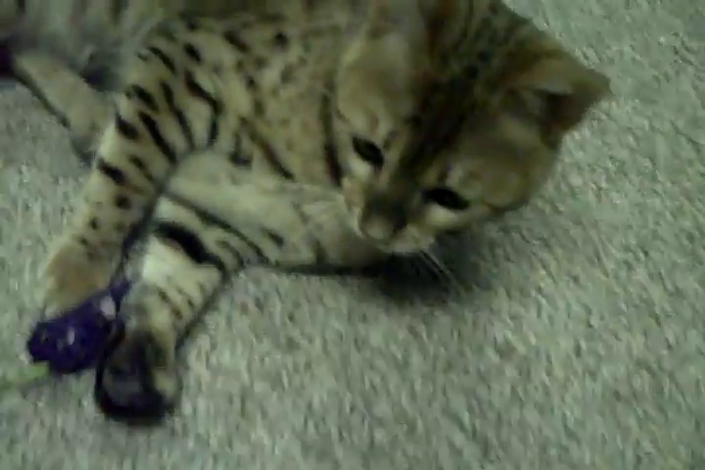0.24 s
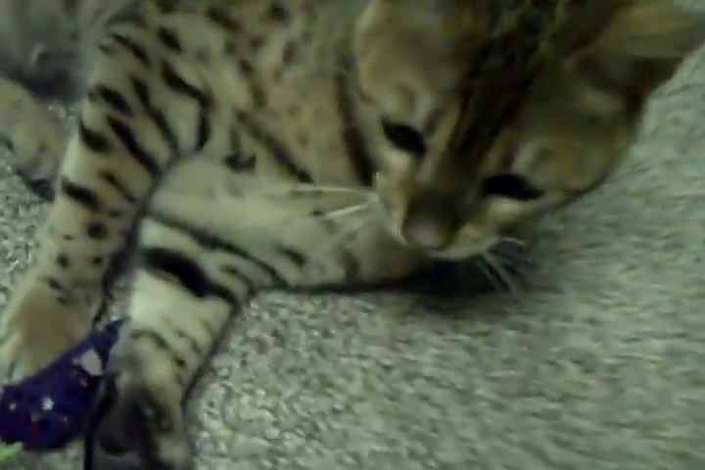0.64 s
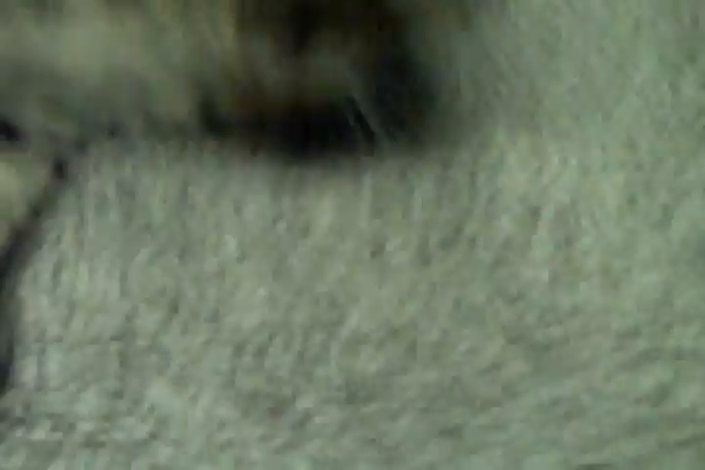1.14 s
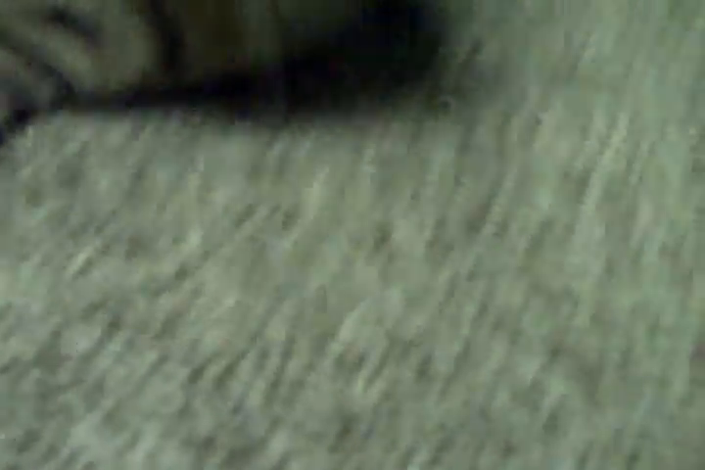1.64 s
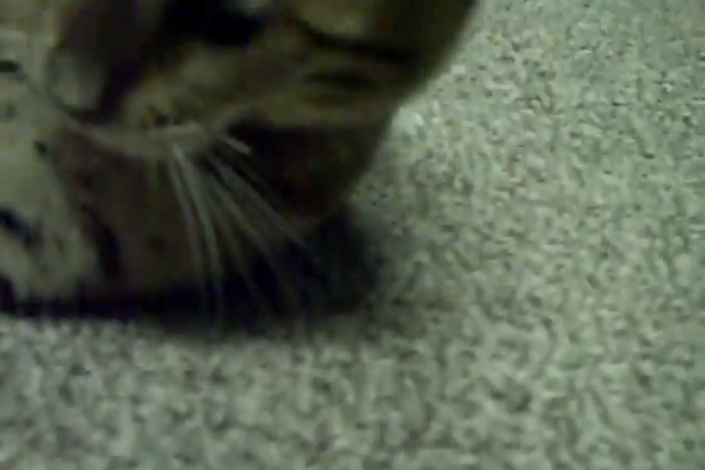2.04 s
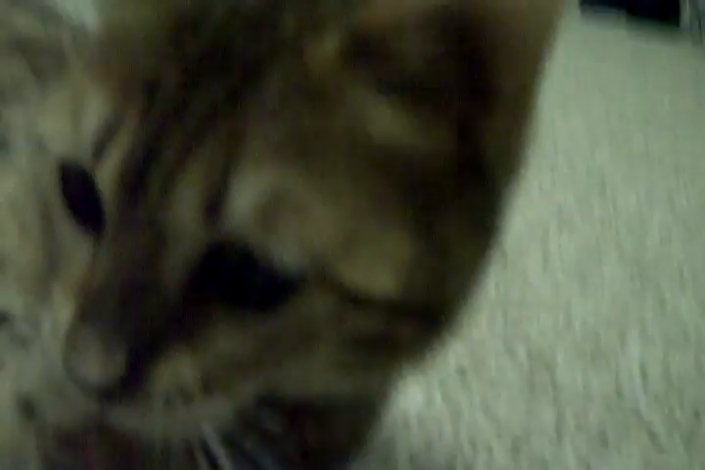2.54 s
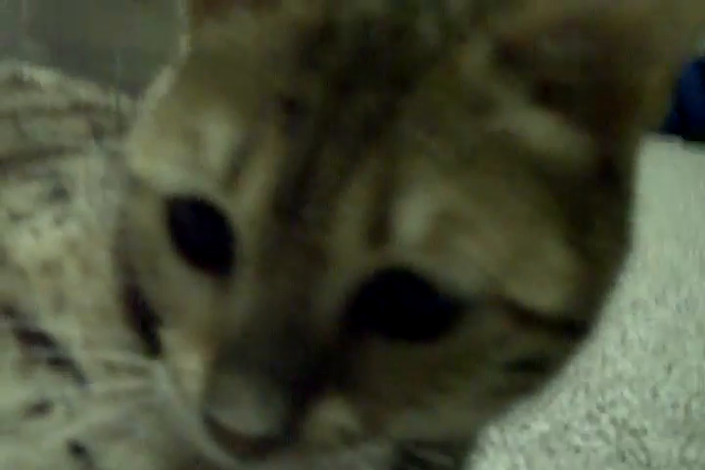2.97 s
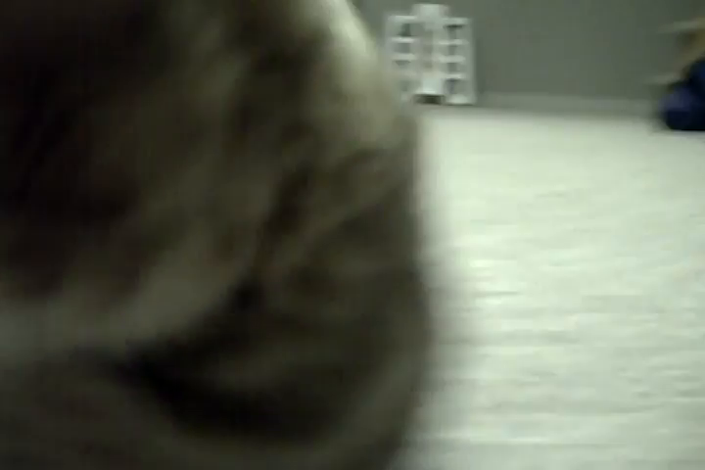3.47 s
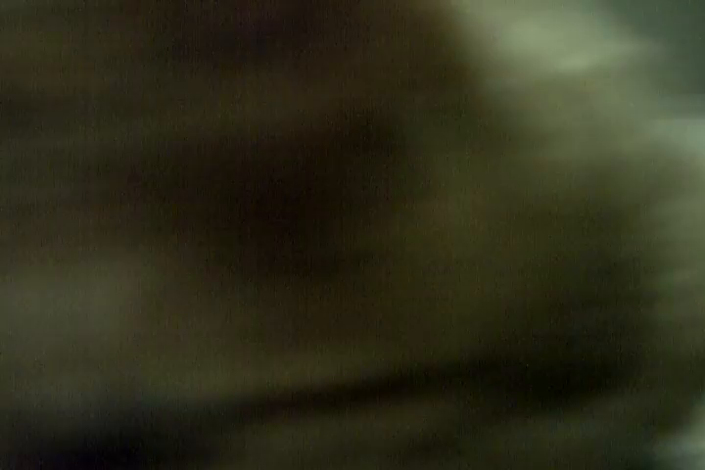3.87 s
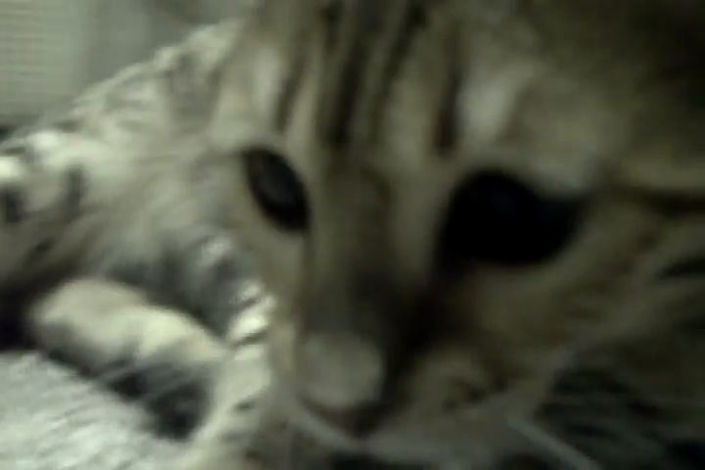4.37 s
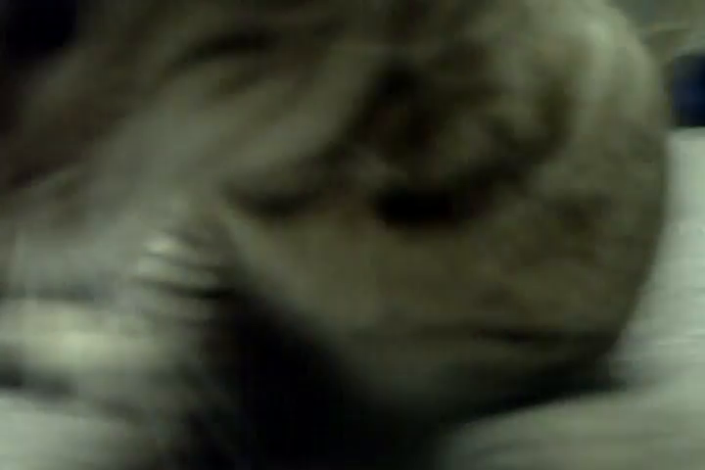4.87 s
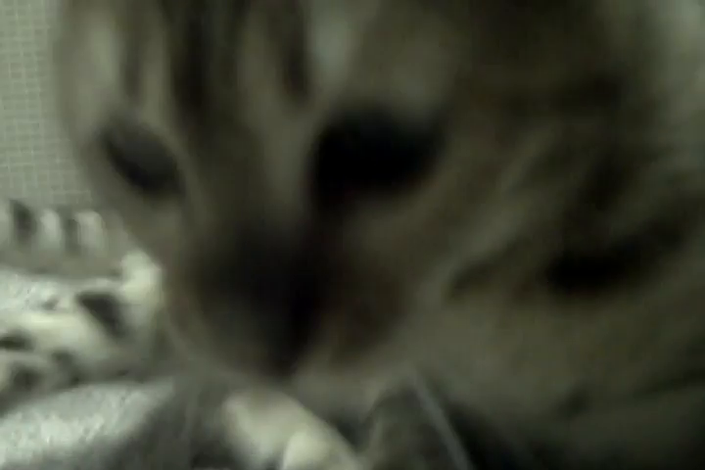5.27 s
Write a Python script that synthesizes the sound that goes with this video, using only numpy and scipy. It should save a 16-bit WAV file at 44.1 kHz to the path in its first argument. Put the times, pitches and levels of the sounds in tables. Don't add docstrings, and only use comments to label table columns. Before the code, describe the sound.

A cat's claws and pads crack and tick against a small plastic camera case, then fur and muzzle hiss across its microphone over faint hum.

```python
import sys
import numpy as np
from scipy import signal
from scipy.fft import rfft, irfft
from scipy.io import wavfile
from scipy.ndimage import uniform_filter1d

SR = 44100
rng = np.random.default_rng(int(sys.argv[2]) if len(sys.argv) > 2 else 0)


def transcribe(u):
    v = np.clip(np.atleast_2d(u).T, -1, 1)
    q = np.round(v * 32767).astype(np.int16)
    wavfile.write(sys.argv[1], SR, q)


def to_linear_factor(level_db):
    exponent = np.asarray(level_db, float) / 20
    return 10 ** exponent


N = 242731


def unit(x):
    return x / np.sqrt(np.mean(x ** 2))


def walk(rate_hz):
    hold = int(SR / rate_hz)
    steps = np.repeat(rng.standard_normal(N // hold + 1), hold)
    return 1.1 * uniform_filter1d(uniform_filter1d(steps, hold), hold)[:N]


# start in seconds, bright ring peak in dB, contact in ms,
# rebound delay in ms, rebound minus strike in dB.
CLAW_STRIKES = [
    (1.0286, -9.5, .93, 2.9, -8.5),
    (1.0917, -5, .5, 5.6, -9),
    (1.2129, -3, .9, 4.9, -10),
    (1.2454, -5.5, 1.1, 6.2, -7),
    (1.4176, -29, .83, 2.1, -15),
    (2.3357, -11.5, 1.1, 3.9, -9.5),
    (2.3641, -4.6, 1.2, 3.6, -16),
    (4.8695, -25, .85, 12.3, -27),
    (5.0472, -12.5, .9, 4.7, 2),
]
# delay in ms, bright, middle, thud and hollow ring in dB against the blow,
# contact in ms (the blow's scales the strike's contact; below 0.1 plays as 0.1).
GRAZE = (-2, -22, -27.5, -39.5, -36, -1.66)
BLOW = (0.5, -0.5, -3, -18.5, -31, 1)
CHATTER = (3.5, -18.5, -15, -41, -24.5, -5.5)
REBOUND = (0, 3, -0.5, -13, -23, 0.66)
SETTLE = (3.5, -18, -11.5, -21.5, -24, -1.8)


def claw_strikes():
    rows = []
    for s, db, contact_ms, later_ms, later_db in CLAW_STRIKES:
        strike = (s, db, (GRAZE, BLOW, CHATTER))
        rebound = (s + later_ms / 1000, db + later_db, (REBOUND, SETTLE))
        for start_s, top_db, parts in (strike, rebound):
            for part in parts:
                peaks_db = top_db + np.array(part[1:5])
                scale = contact_ms if part is BLOW else 1
                rows.append((start_s + part[0] / 1000, *peaks_db, part[5] * scale))
    return rows


# start in seconds, thud peak in dB, hollow minus thud in dB,
# middle ring minus thud in dB.
PAD_KNOCKS = [(.3102, -49, -5.5, -20), (1.0088, -21.5, -1.5, -4.5), (1.0141, -26, -7, 2.5),
              (1.1961, -33.5, -5.5, -3), (1.238, -46, 10, 18), (1.3275, -33.5, 6.5, -10.5),
              (1.329, -37.5, 10, 2.5), (1.334, -30, 0, -10), (1.4317, -35.5, -8, -13),
              (1.5561, -54, 9.5, 4), (1.637, -33.5, -2.5, -15), (2.0016, -34, 0, -12),
              (2.0048, -29.5, -14, -4.5), (2.008, -46, 14, 9), (2.1077, -25.5, -8, 1),
              (2.1122, -19, -30, -12), (2.1145, -30.5, 4.5, -10), (2.3286, -35, 2.5, -6),
              (2.3573, -39, 10, 6), (2.8562, -43, -4, 0.5), (5.0544, -17, -1, -6),
              (5.1497, -41.5, -4, -3.5), (5.2329, -41, -4, -7.5), (5.274, -34.5, -3, -4.5)]


def pad_knocks():
    bright_under_middle_db, contact_ms = -8, 1.4
    return [(s, db + mid + bright_under_middle_db, db + mid, db, db + hollow, contact_ms)
            for s, db, hollow, mid in PAD_KNOCKS]


# start in seconds, middle ring peak in dB, bright minus middle in dB.
CLAW_TICKS = [(1.0232, -30, 2), (1.078, -33.5, 5), (1.082, -35, 1), (1.1082, -58, -2), (1.2446, -29, 13),
              (1.248, -20, -10), (1.3432, -41.5, 1), (1.3508, -47, -4), (1.3647, -49, -3),
              (1.4421, -36, -2), (1.4942, -50, -6.5), (1.5476, -48, -7), (1.5802, -54, -9),
              (1.6782, -39, 3.5), (1.7612, -51, 1), (1.9956, -46.5, -7.5), (2.0198, -51, -5),
              (2.052, -51, -1), (2.0747, -45.5, -7), (2.0992, -59, -7), (2.3138, -46, 0), (2.574, -59, 8),
              (4.2632, -33, 1)]


def claw_ticks():
    thud_db, hollow_db, contact_ms = -11.5, -12, 0.74
    return [(s, db + bright, db, db + thud_db, db + hollow_db, contact_ms)
            for s, db, bright in CLAW_TICKS]


def ring(modes, rise_s):
    hz, db, t60_s = np.transpose(modes)
    t = np.arange(int(t60_s.max() * SR))[:, None] / SR
    fade = np.exp(-np.log(1000) * t / t60_s) * (1 - np.exp(-t / rise_s))
    return hz, to_linear_factor(db) * fade * np.sin(2 * np.pi * hz * t)


def even(force, bins=15):
    spectrum = rfft(np.roll(force, 20), 1024)
    return irfft(spectrum / uniform_filter1d(np.abs(spectrum), bins))[:len(force)]


# frequency in Hz, level in dB, t60 in seconds.
EDGES = [(5680, -2.5, 0.0036), (6170, -1, 0.0054), (6730, -2.5, 0.0059), (7260, 10.5, 0.0038),
         (7870, -12.5, .006), (8440, -5.5, 0.0033), (9470, -11.5, .004), (4870, -34.5, 0.04),
         (8200, -47, .035)]
EDGES_MUZZLE = [(5460, 0.5, 0.0044), (6260, 1.5, 0.0032), (7745, -4, 0.006), (8310, 4.5, 0.0045),
                (10500, -30, 0.0065), (9995, -27.5, 0.006)]
PANELS = [(2104, -5, 0.0091), (2340, -3, 0.011), (3066, 6.5, 0.0075), (3410, 4.5, 0.0078),
          (3894, 8.5, 0.0069)]
PANELS_MUZZLE = [(1760, -1.5, 0.0028), (2400, -10.5, 0.014), (2840, -1, 0.0041), (3524, 5.5, 0.0029),
                 (4290, -14, 0.0042)]
SPRINGS = [(3413, -34, .11), (4150, -37, .12)]
SPRING_MUZZLE = [(4750, -43, .07)]
BACK_THUD = [(1257, 2, 0.0069), (950, -7, 0.011), (1630, -7, 0.0047)]
HOLLOW_BODY = [(666, 9.5, 0.02), (635, -17, 0.11), (557, -10, 0.0083), (370, -9, 0.068)]


def taps():
    muzzle_s = 4.0
    out, t = np.zeros(N + SR), np.arange(600) / SR
    body = [ring(BACK_THUD, 0.000067), ring(HOLLOW_BODY, 0.00035)]
    free = [ring(EDGES, 0.0001), ring(PANELS + SPRINGS, 0.0001)] + body
    covered = [ring(EDGES_MUZZLE, 0.00015), ring(PANELS_MUZZLE + SPRING_MUZZLE, 0.0001)] + body
    claw = signal.butter(2, 1600, "high", fs=SR, output="sos")
    push = np.sin(np.pi * np.clip((t - 0.0006) / 0.00073, 0, 1))
    for s, *peaks_db, contact_ms in claw_strikes() + pad_knocks() + claw_ticks():
        grit, spot = rng.standard_normal(len(t)), rng.standard_normal(12)
        turn = t / (np.clip(contact_ms, 0.1, 1.7) / 1000)
        contact = np.sin(np.pi * np.clip(turn, 0, 1) ** 0.91) ** 2
        scrape = to_linear_factor(-32.5) * np.exp(-t / 0.0033)
        slip = signal.sosfilt(claw, even(grit * (contact + scrape)))
        soft_db = np.clip(peaks_db[1] - peaks_db[0], 0, 20)
        families = free if s < muzzle_s else covered
        forces = (slip, slip, np.gradient(push), push)
        for (hz, modes), db, force in zip(families, peaks_db, forces):
            tilt_db = 3.3 * soft_db * np.log2(hz / hz[0]) * (hz > 1800)
            weight = to_linear_factor(1.1 * spot[:len(hz)] - tilt_db)
            sound = signal.fftconvolve(force, modes @ weight)
            crest = np.sqrt(2 * uniform_filter1d(sound[:400] ** 2, size=30).max())
            at = int(s * SR) - 14
            out[at:at + len(sound)] += to_linear_factor(db) * sound / crest
    return out[:N]


# start in seconds, peak in dB, frequency in Hz, sign.
SHOVES = [(1.008, -38, 52.3, -1), (1.008, -20, 486.6, 1), (1.085, -46, 45, -1), (1.207, -37, 51, -1),
          (1.212, -29, 180, 1), (1.23, -45, 29.7, 1), (1.325, -37, 55.7, -1), (1.329, -38, 195, 1),
          (2.004, -33.5, 320, 1), (2.31, -37.5, 30, -1), (5.273, -31.5, 226, -1), (5.363, -44, 170, 1)]


def shoves():
    out = np.zeros(N)
    for s, db, hz, sign in SHOVES:
        turn = np.arange(int(1.6 * SR / hz)) * hz / SR
        rock = np.sin(2 * np.pi * turn) * np.hanning(len(turn))
        at = int(s * SR)
        out[at:at + len(turn)] += np.sign(sign) * to_linear_factor(db) * rock
    return out


def resonate(x, peaks):
    out = 0
    for k, (hz, width_hz, db) in enumerate(peaks):
        b, a = signal.iirpeak(hz, hz / width_hz, fs=SR)
        twice = signal.lfilter(b, a, signal.lfilter(b, a, x))
        out = out + (-1) ** k * to_linear_factor(db) * twice
    return unit(out)


def hiss_colour(dull_db):
    return to_linear_factor(np.array([[0], [-1 + 0.33 * dull_db], [dull_db]]))


# fullest at in seconds, swell in seconds, fade in seconds,
# bright hiss in dB, dullness in dB.
FUR_STROKES = [(.87, 0.075, 0.11, -74.5, 8.5), (1.013, 0.0057, 0.012, -50, 13.5),
               (1.04, .004, 0.038, -63, 8), (1.225, .004, 0.0067, -66, 14), (1.243, 0.011, 0.0024, -47, 7),
               (1.35, .005, 0.19, -72.5, 6), (1.449, 0.0066, 0.1, -74.5, 15.5),
               (1.56, 0.0192, 0.091, -69.5, 7), (1.63, 0.053, .02, -61, 3.5), (1.77, .02, .05, -75.5, 8.5),
               (2.331, .018, 0.006, -53, 11), (2.347, 0.0027, 0.0092, -50.5, 7.5),
               (1.92, .12, 0.073, -76.5, 7), (2.911, 0.0395, 0.081, -69.5, 1), (4.121, 0.3, 0.27, -68, 8.5),
               (4.347, 0.042, 0.065, -68, -13), (4.66, 0.061, 0.032, -59, 1),
               (4.705, 0.048, 0.059, -50, -7), (4.826, 0.023, 0.027, -57, 1),
               (5.04, .11, .008, -51.5, -9.5), (5.399, .08, 0.12, -69.5, -6)]
# start in seconds, length in seconds,
# bright hiss in dB, drift over the length in dB, dullness in dB.
PRESSES = [
    (1.074, .013, -44, -2, -13),
    (1.163, .04, -48, 8, -13),
    (1.627, 0.082, -47, -7, -8),
    (2.626, 0.11, -67.5, -0.5, -1),
    (4.207, 0.089, -40.5, -7.5, -6.5),
    (4.359, 0.071, -57, -3, 1.5),
    (4.505, 0.034, -62.5, -2.5, 7.5),
    (4.663, .19, -58, -2, 2),
]
# frequency in Hz, width in Hz, level in dB.
HISS_BRIGHT = [(5690, 980, 1.5), (6640, 1100, -4), (7560, 1100, -2), (8500, 910, 1.5), (10100, 1500, -10)]
HISS_MIDDLE = [(1775, 500, -7), (2570, 1100, -0.5), (3377, 900, -1), (4400, 1200, -8.5)]
HISS_LOW = [(690.4, 300, -0.8), (1292, 520, -1.2)]


def rubs():
    edge_db, roundness = 22, 2.2
    attack_s, release_s = 0.014, 0.027
    t, power = np.arange(N) / SR, np.zeros((3, N))
    grain_db = np.minimum(2.1 * rng.exponential(size=N // 8 + 1), 9.0).repeat(8)[:N]
    grain = to_linear_factor(grain_db + 1.2 * walk(60))
    bands = [resonate(grain * rng.standard_normal(N), peaks)
             for peaks in (HISS_BRIGHT, HISS_MIDDLE, HISS_LOW)]
    for s, swell_s, fade_s, db, dull_db in FUR_STROKES:
        span = slice(int((s - 1.3 * swell_s) * SR), int((s + 1.3 * fade_s) * SR))
        since = t[span] - s
        away = np.where(since < 0, -since / swell_s, since / fade_s)
        power[:, span] += (hiss_colour(dull_db) * to_linear_factor(db - edge_db * away ** roundness)) ** 2
    for s, length_s, db, drift_db, dull_db in PRESSES:
        span = slice(int(s * SR), int((s + length_s + release_s) * SR))
        since = t[span] - s
        edge = np.minimum(since / attack_s, 1 - (since - length_s) / release_s)
        level = np.clip(edge, 0, 1) ** 2 * to_linear_factor(db + drift_db * since / length_s)
        power[:, span] += (hiss_colour(dull_db) * level) ** 2
    return (np.sqrt(power) * bands).sum(axis=0)


# frequency in Hz, level in dB rms.
HUM = [(120.0, -57.5), (257.1, -59), (327.5, -71.5)]


def hum():
    t = np.arange(N) / SR
    return np.sqrt(2) * sum(to_linear_factor(db + 0.99 * walk(3.94)) * np.sin(2 * np.pi * hz * t) for hz, db in HUM)


WHINE_DB = [-95.5, -89, -82, -70.5, -82.5, -88, -88, -95]


def whine():
    carrier_hz, step_hz = 7558.3, 57.8
    t, out = np.arange(N) / SR, 0
    for k, db in enumerate(WHINE_DB):
        hz = carrier_hz + (k - 3) * step_hz
        out = out + to_linear_factor(db) * np.sin(2 * np.pi * hz * t + rng.uniform(0, 2 * np.pi))
    return np.sqrt(2) * out


# frequency in Hz, density in dB per Hz.
ROOM = [(11, -41), (18, 6.5), (69, -4.5), (122, -7), (174, -10.5), (255, -8), (490, -17.5), (1080, -22),
        (1310, -26.5), (3700, -35.5), (6740, -34.5), (7730, -34), (8390, -34), (10400, -37), (12300, -61),
        (16000, -93.5), (22000, -120)]
# frequency in Hz, width in Hz, height in dB.
DUCT = (2500, 330, 5.6)


def room():
    f = np.fft.rfftfreq(N, 1 / SR)
    hz, db = np.transpose(ROOM)
    duct_hz, width_hz, duct_db = DUCT
    spectrum = rfft(rng.standard_normal(N)) * to_linear_factor(np.interp(np.log(f + 1), np.log(hz), db))
    spectrum = spectrum * to_linear_factor(duct_db * np.exp(-((f - duct_hz) / width_hz) ** 2))
    bass = irfft(spectrum * (f < 450), N)
    rest = irfft(spectrum, N) - bass
    return unit(bass * to_linear_factor(1.7 * walk(15)) + rest * to_linear_factor(0.47 * walk(1.2))) * to_linear_factor(-55.5)


# time in seconds, gain in dB.
GAIN = [(0, -0.5), (1, 0.5), (2, 1.07), (3, 0.87), (4, 1.85), (5, 1.6), (5.5, 1.1)]


def background():
    gain_db = np.interp(np.arange(N) / SR, *np.transpose(GAIN))
    return (room() + hum() + whine()) * to_linear_factor(gain_db)


def scene():
    return (taps() + shoves() + rubs() + background())[None]


def low_pass(x):
    return signal.sosfilt(signal.butter(12, 16810, fs=SR, output="sos"), x)


def record(dry):
    mic_top_hz, clip, path_top_hz = 11600, 0.79, 15900
    mic = signal.cheby1(10, 0.5, mic_top_hz, fs=SR, output="sos")
    path = signal.cheby1(8, 0.5, path_top_hz, fs=SR, output="sos")
    dull = signal.sosfilt(mic, dry)
    clipped = signal.sosfilt(path, np.clip(dull, -clip, clip))
    return low_pass(clipped)


dry = scene()
out = record(dry)
transcribe(out)
```